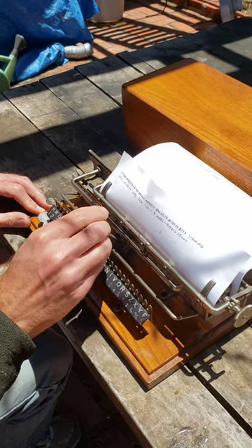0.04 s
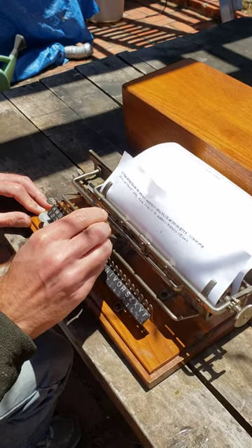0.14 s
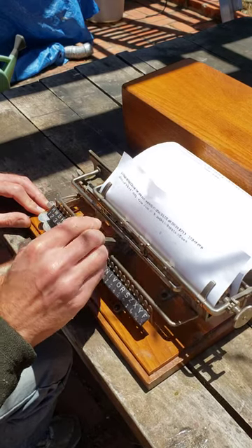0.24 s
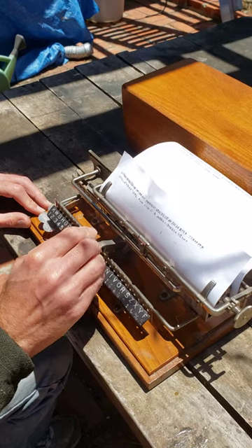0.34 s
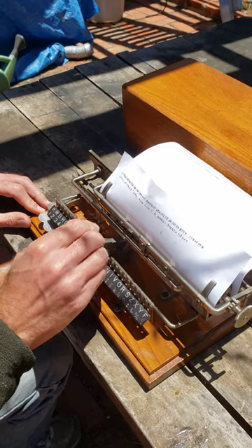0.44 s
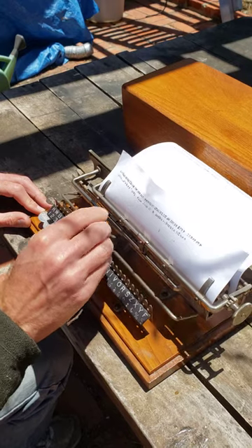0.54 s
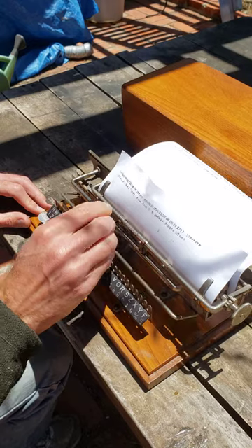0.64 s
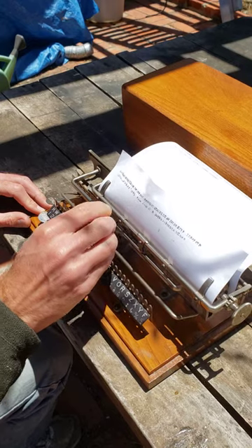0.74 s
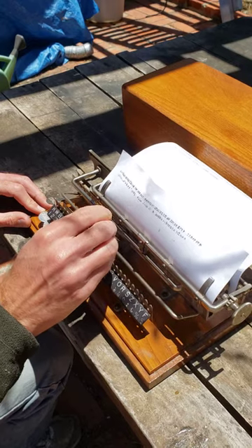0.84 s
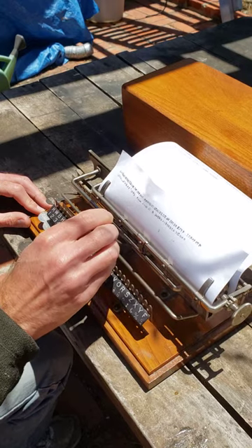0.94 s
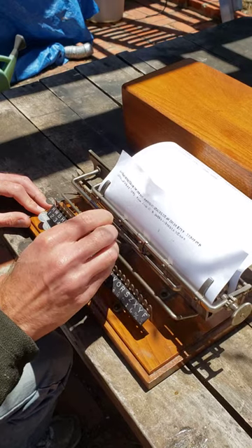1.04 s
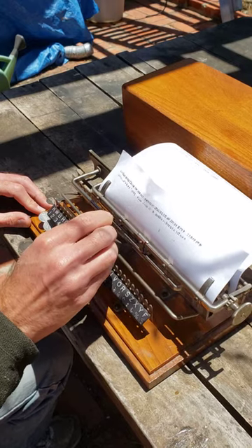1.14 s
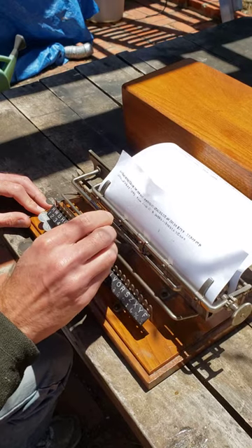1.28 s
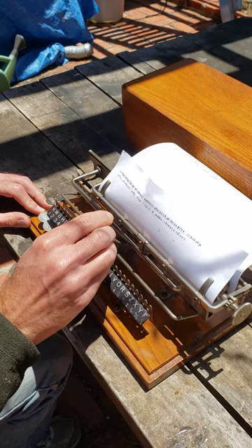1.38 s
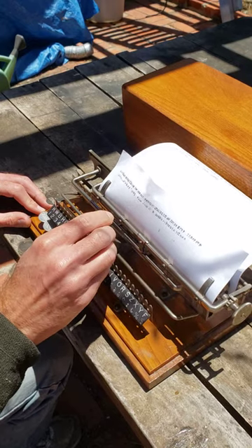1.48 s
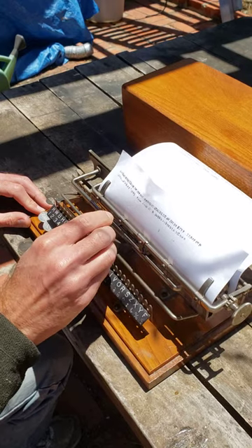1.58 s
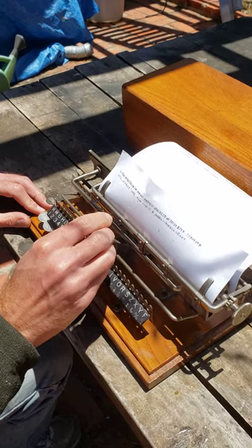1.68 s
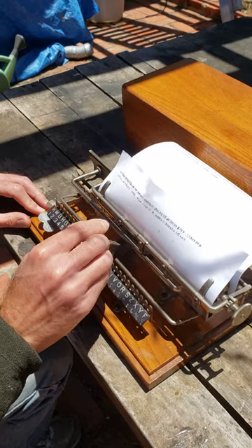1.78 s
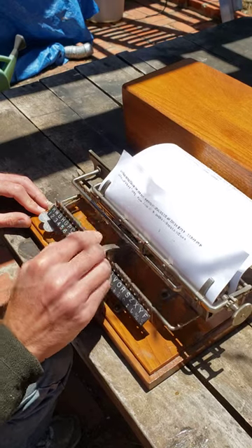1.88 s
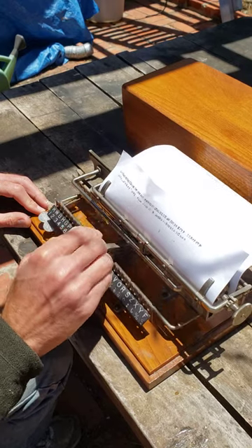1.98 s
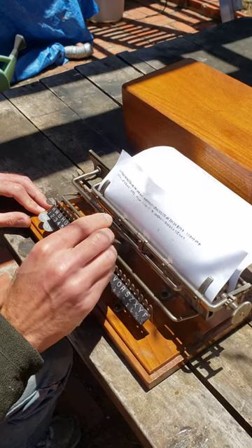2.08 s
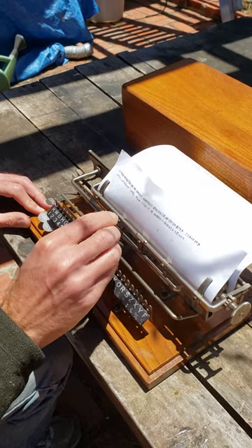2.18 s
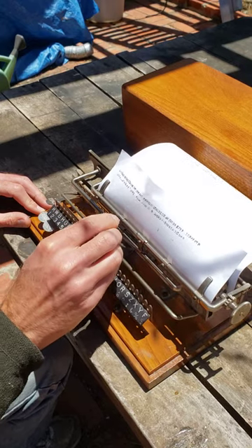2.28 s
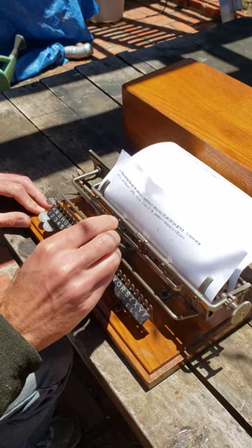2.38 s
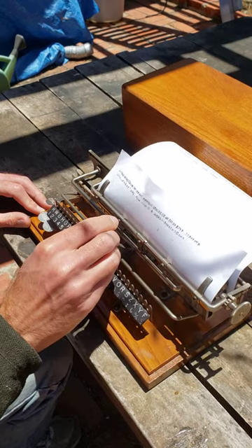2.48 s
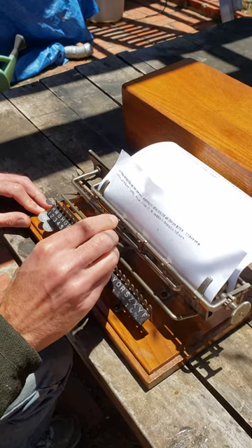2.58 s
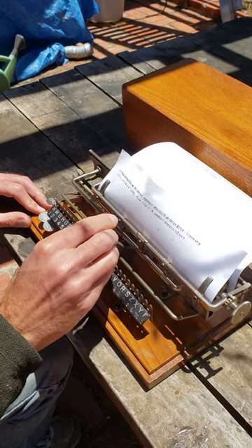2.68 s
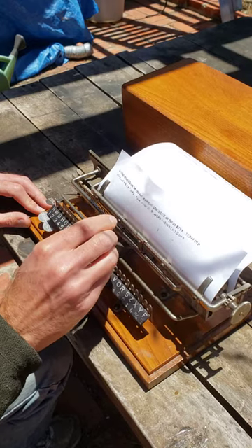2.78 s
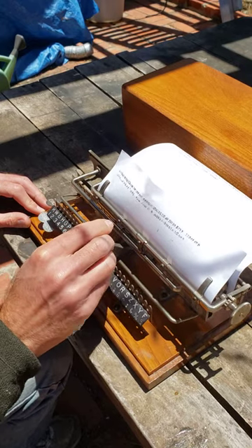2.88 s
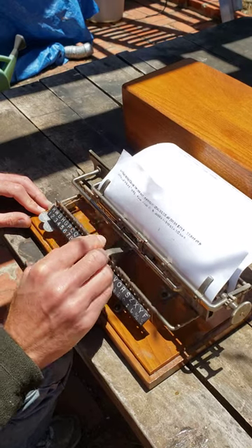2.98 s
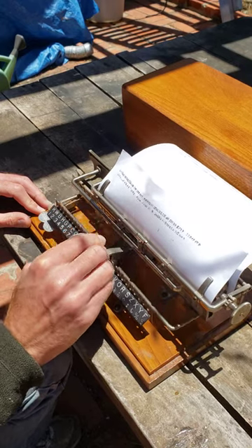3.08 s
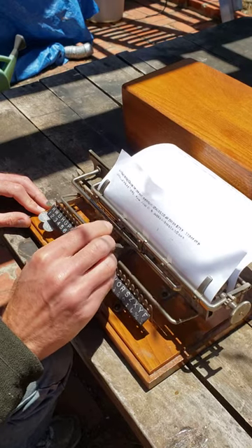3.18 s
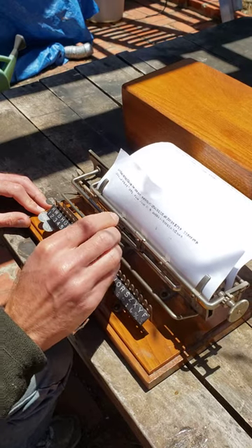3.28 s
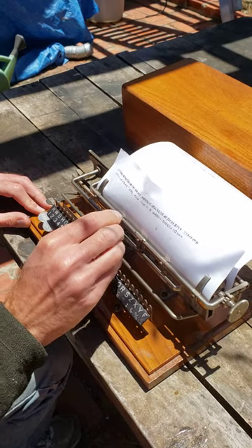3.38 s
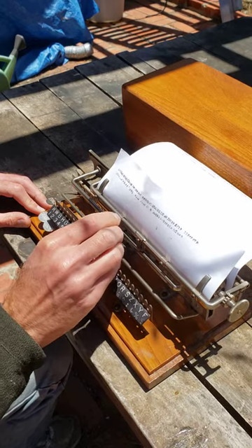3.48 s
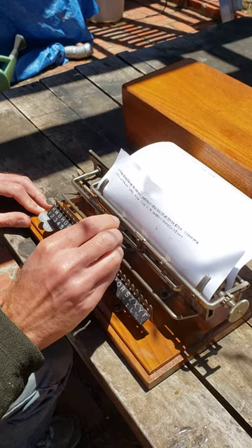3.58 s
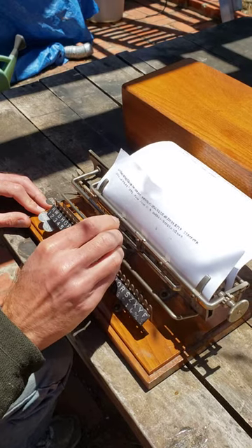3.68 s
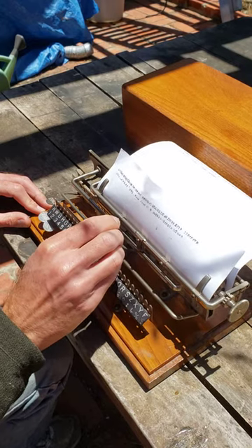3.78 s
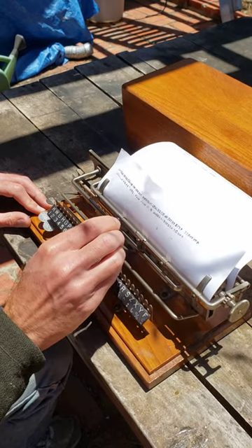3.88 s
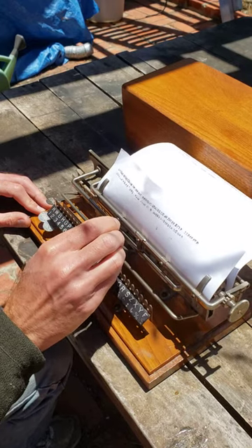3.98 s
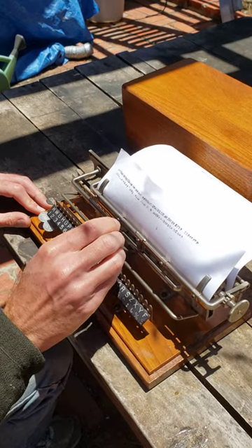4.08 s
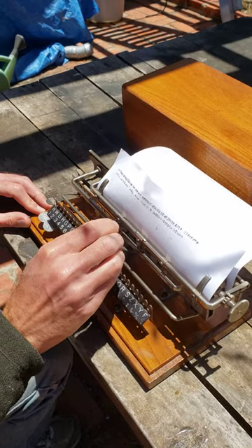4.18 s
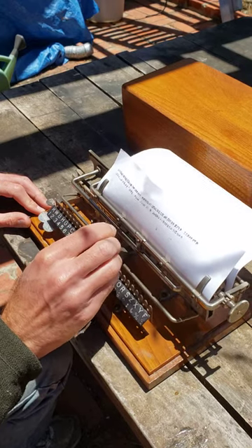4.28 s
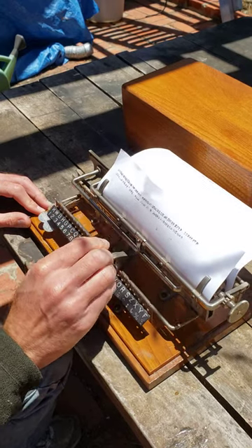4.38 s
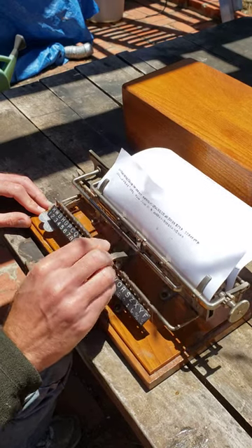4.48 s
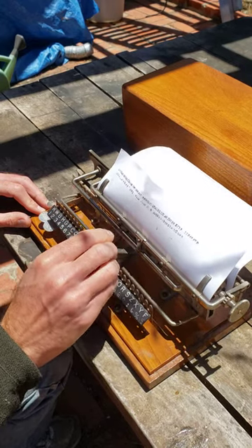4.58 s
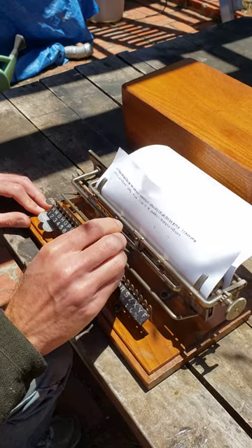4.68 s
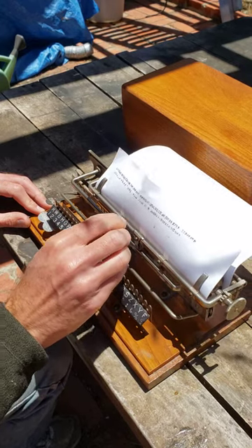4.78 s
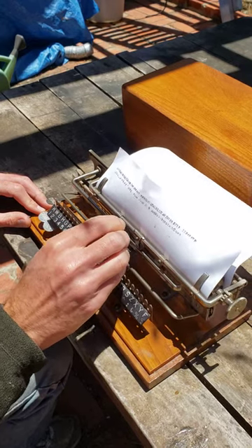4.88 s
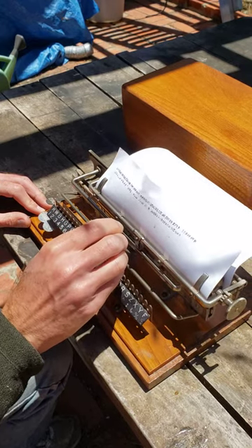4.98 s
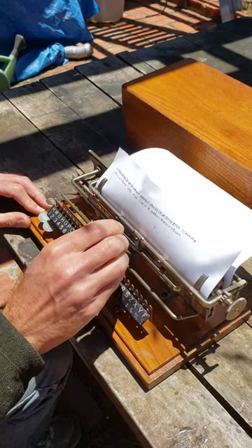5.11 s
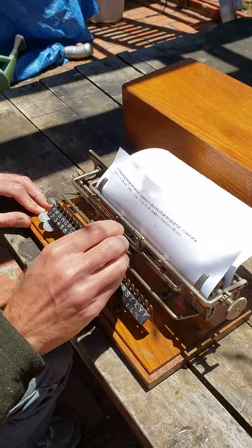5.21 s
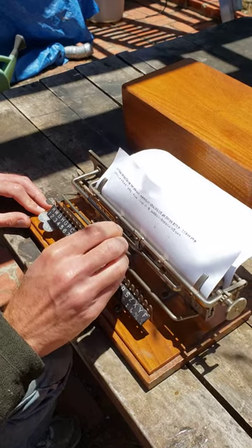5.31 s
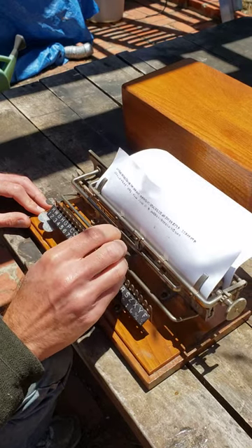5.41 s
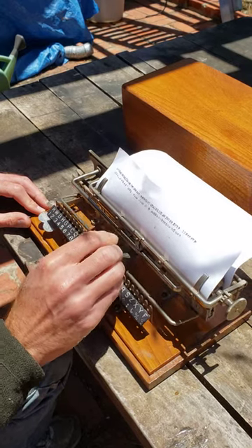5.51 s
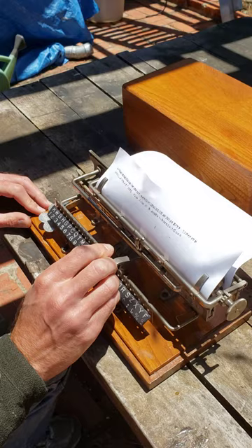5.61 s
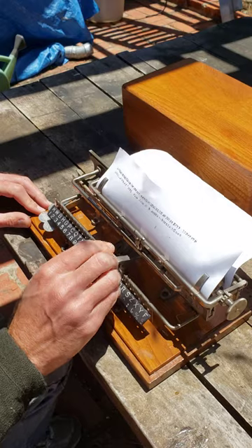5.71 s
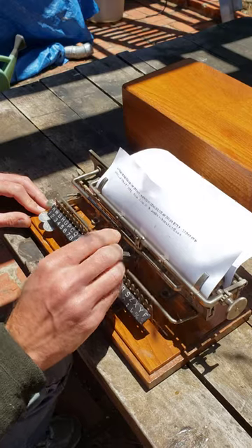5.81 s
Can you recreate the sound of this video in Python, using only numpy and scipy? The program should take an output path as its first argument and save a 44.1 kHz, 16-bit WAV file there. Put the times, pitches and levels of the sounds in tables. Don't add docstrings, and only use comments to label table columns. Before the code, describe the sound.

Five times, a little over a second apart, a small metal mechanism clicks, rattles and lands with a low knock on its wooden base, then snaps hard and bright about a fifth of a second later. Thin metal ringing trails very faintly. The small stereo microphone is close, the machine leaning left; behind it lies an open garden with soft distant traffic and tiny early peeps.

```python
import sys
import numpy as np
from scipy import signal
from scipy.io import wavfile
from scipy.ndimage import uniform_filter1d

SR = 44100
rng = np.random.default_rng(int(sys.argv[2]) if len(sys.argv) > 2 else 0)


def voltage_ratio(decibels):
    exponent = np.asarray(decibels, float) / 20
    return 10 ** exponent


def log_audio(samples):
    frames = np.atleast_2d(samples).T
    limited = np.clip(frames, -1, 1)
    pcm = np.round(limited * 32767).astype(np.int16)
    wavfile.write(sys.argv[1], SR, pcm)


N = 257984

# t/s, pawl ring level/dB, bright chatter above it/dB
SNAPS = [(0.5126, -7, -4), (2.0596, -5.5, -6), (3.1973, -10, -3), (4.6279, -12.5, -2), (5.8171, -12, -4)]
# t after the strike/ms, level/dB, contact/ms
REBOUNDS = [
    (0, 4.5, 0.025),
    (.7, -7, 0.04),
    (1.39, 0.5, .13),
    (1.74, 2.5, .13),
    (4.2, -11, 0.12),
    (7.0, -12, 0.11),
]
# f/Hz, level/dB, t60/s, right below left/dB, right late/ms
PAWL_MODES = [(1230, -23, 0.03, 1.5, 0.25), (1510, -22.5, 0.014, 2, 0.12), (1716, -19, 0.025, 2, .05),
              (1990, -17.5, 0.03, 3.5, 0.028), (2560, -7, 0.008, 7, .03), (2810, -0.5, 0.0045, 4.5, .05),
              (3020, -7, 0.008, -1, 0.048), (3900, -0.5, 0.0073, 7, 0.084), (4400, -13.5, 0.012, 6, 0.081),
              (4900, -15, 0.023, 4, 0.15), (6100, -13.5, 0.011, 2.5, .2), (7100, -9.5, 0.01, 5.5, .2),
              (7500, -9, 0.018, 6, .2)]
# f/Hz, level/dB, t60/s, right below left/dB, right late/ms
FRAME_MODES = [(1320, -10, .012, 4, 0.02), (2124, -7.5, 0.0037, 0, 0.04), (2400, -6, 0.0027, 16, 0.012),
               (2800, 1, .006, 2, 0.017), (3200, -2.5, 0.0039, 8.5, 0.013), (3650, 3, 0.0044, 14, 0.079),
               (4970, -7.5, 0.0086, -1.5, 0.15), (5450, -16.5, 0.015, 0.5, 0.42),
               (6288, -17.5, 0.021, -2.5, 0.3), (7200, -15.5, .006, 6, 0.19)]
# f/Hz, level/dB, t60/s, right below left/dB, right late/ms
LINK_MODES = [(8990, -14.5, 0.0018, 2, 0.6), (10300, -10.5, 0.00084, 3.5, 0.17),
              (12204, -6, 0.002, 1.5, 0.22), (11950, -0.5, 0.0023, 1, 0.08), (13400, -4, .0016, 2.5, 0.23),
              (13600, -4.5, 0.0025, 9.5, 0.17), (15000, -2.5, 0.0014, 9, 0.36),
              (15600, 1, 0.0027, 10, 0.067)]
# f/Hz, level/dB, t60/s, right below left/dB, right late/ms
BASE_MODES = [(230, -10.5, 0.05, 2.5, .05), (353, -11, .06, 1, 0.045), (420, -3.5, .05, 3.5, .05),
              (617.5, 4.5, 0.026, 5, .05), (810, -1, 0.04, 6.5, 0.11), (1050, -1.5, .03, 6.5, 0.28),
              (1538, -2, 0.015, 9.5, 0.078)]
PAWL_FREE_MS, PAWL_HELD_DB = 4.5, -14.5

# t after its start/ms, frame level/dB, bright chatter above it/dB,
# base knock above it/dB, chatter length/ms
ENGAGE = [
    (0, 1.5, -16, -11, 4.5),
    (9.5, -9.5, -3, -6.5, 2.5),
]
CLICK = [
    (0, 2, 0, -15, 2.7),
    (19, -19.5, -3.5, -3, 8.0),
]
LANDING = [
    (-4.5, -20.5, 2, 2, 4.5),
    (0, 1.5, -12, -14, 2.7),
    (6.5, -7.5, 2, -3.5, 3.8),
    (24, -22.5, -9, 5.5, 12.0),
    (47.5, -34, -13, 8, 14.0),
]
RELEASE = [
    (0, 1, 3, 1.5, 5.0),
    (7.8, 11, -17.5, -13.5, 1.8),
    (13, 0, -13, -12, 2.5),
    (18.46, 3.5, 0.5, -7.5, 6.0),
    (36, -7, -5, 0.5, 5.0),
]
# t/s, level/dB
ENGAGE_TIMES = [(0.2876, -23.5), (1.8186, -28.5), (2.9531, -46.5), (4.3688, -29), (5.5627, -35.5)]
CLICK_TIMES = [(0.296, -21), (1.8378, -21.5), (2.9642, -21), (4.3814, -25.5), (5.5681, -26.5)]
LANDING_TIMES = [(0.3308, -17), (1.87, -17), (3.0044, -18.5), (4.4268, -19), (5.6138, -17.5)]
RELEASE_TIMES = [(.4597, -35), (2.0068, -36), (3.134, -40.5), (4.5677, -35), (5.7463, -38)]
# t/s, level/dB, bright chatter above it/dB
BOUNCES = [(.3346, -21, -3), (.3437, -29, 4), (1.9057, -42, -15.5), (1.9292, -44, -11), (4.4429, -28, -0.5),
           (4.4505, -40, -18), (4.4661, -41, -19.5), (4.4791, -41.5, -6), (5.6287, -25.5, 4),
           (5.6364, -28.5, -10), (5.6449, -34.5, -8), (5.6521, -28.5, -5), (5.6645, -37.5, 0),
           (5.6743, -43, -12)]
BOUNCE_KNOCK_DB, BOUNCE_MS = -11, 4.0
# t/s, level/dB, bright chatter above it/dB, base knock above it/dB
TOUCHES = [(0.1838, -52, -5, -9), (0.2531, -48.5, -14, 3), (0.2735, -56, 0, -11), (.589, -55.5, -4, -8),
           (.6137, -56.5, 6, 3.5), (1.6978, -55, -2, -5.5), (1.775, -59, -6.5, -7.5),
           (2.378, -53.5, -10.5, -3.5), (2.8604, -49, 4, -11), (2.8823, -54.5, -1, -14),
           (2.9043, -52, -17.5, 8.5), (2.924, -50, -7, -7), (3.3124, -57, 0, -1), (4.2432, -49, 2.5, -10),
           (4.2651, -50, -17, 5), (4.2952, -51, -10, 3), (4.322, -53, -8, 2), (4.352, -53, -9.5, -8),
           (4.7152, -47, -8, -11.5), (4.7214, -49.5, 0.5, -2), (5.4041, -51.5, 7.5, -3),
           (5.4636, -50.5, -23, 4), (5.472, -52.5, -17, 7.5), (5.5961, -43, -4, -12)]
TOUCH_MS, DRAG_AFTER_MS, DRAG_DB, DRAG_MS = 2.6, 8.9, -8.5, 14

# t/s, level/dB, f/Hz
THUDS = [(0.296, -37, 113), (0.331, -21, 170), (1.841, -25, 113), (1.871, -24, 172), (2.968, -42, 104.8),
         (3.005, -27, 129), (4.372, -89.5, 90), (4.428, -26, 172), (4.449, -19, 104), (5.617, -25.5, 130),
         (5.687, -19, 101)]
# t/s, guide rod level/dB, rack level/dB
RODS = [(0.336, -80.5, -75.5), (.513, -80, -59.5), (2.06, -82.5, -56.5), (3.01, -64, -84),
        (3.195, -71.5, -66), (4.628, -75.5, -71.5)]
GUIDE_HZ, GUIDE_T60, RACK_T60 = 3488, 3.8, 0.75
RACK_HZ = np.array([[5846], [5965], [6029]])
RACK_DB = [
    [-4.5],
    [1],
    [-5.5],
]
# t/s, level/dB, f/Hz, t60/s
PINGS = [(.1842, -58, 6400, 0.026), (1.6973, -57.5, 6500, .03), (2.86, -53.5, 6470, .03),
         (4.2432, -56, 6650, 0.027), (2.378, -58.5, 5950, 0.033), (5.4725, -50, 2800, 0.06),
         (5.535, -64, 7000, 0.036)]

# f/Hz, t60/s
YARD_DECAY = [(300, 0.4), (1300, 0.29), (3500, 0.3245), (9000, 0.2669), (16000, 0.22)]
# f/Hz, level/dB
YARD_TONE = [(300, 1.5), (1000, 5.5), (3000, -5.5), (6000, 0.5), (9000, -4), (15000, -8.5)]
YARD_DB, CRACK_DB = -9.5, 5
NEAR_DB, NEAR_T60 = 13.5, 0.05

# t/s, f/Hz, level/dB
PEEPS = [
    [(.9, 10320, -107), (.92, 10350, -62.5), (.976, 10290, -67), (1.0, 10300, -99)],
    [(1.36, 2720, -93), (1.378, 2770, -82), (1.42, 2740, -67.5), (1.48, 2770, -92)],
]
# f/Hz, level per Hz/dB
AIR_TONE = [(24, -34), (45, -7), (63, -1.5), (152, -17), (211, -19.5), (286, -24), (358, -26),
            (1890, -46.5), (3210, -50.5), (3550, -49), (4020, -56), (6020, -50.5), (8360, -62),
            (15300, -58), (16500, -83.5)]
AIR_DB, RUMBLE_TOP_HZ = -45, 130
# t/s, level/dB
TRAFFIC = [(0.0, -53.5), (0.99, -51), (1.55, -53), (1.9, -50), (2.31, -54), (2.7, -50), (3.16, -49.5),
           (3.24, -50.5), (4.01, -51), (5.85, -45)]
# t/s, level/dB
FAR_WASH = [(0.0, -70), (0.34, -68), (2.9, -71), (3.08, -63.5), (3.44, -71), (4.28, -71.5), (4.43, -67),
            (5.36, -71), (5.85, -63)]
# f/Hz, likeness/1
AIR_SAME = [(60, .86), (150, .94), (380, .77), (950, .1), (2380, .05), (5980, .04), (15000, .035)]
# f/Hz, left above right/dB
AIR_LEFT = [(60, 0.5), (150, 3.4), (380, 4.5), (950, 9), (2380, 10), (5980, 5.5), (15000, 5.5)]
MIC_LOW_HZ, MIC_TOP_HZ = 45.5, 15800


def pawl():
    snap, crack = np.zeros((2, N)), np.zeros((2, N))
    fizz = rng.standard_normal((2, 900))
    t_ms = np.arange(2699) / SR * 1000
    for (s, db, bright_db), draw in zip(SNAPS, rng.standard_normal((len(SNAPS), 4, 900))):
        blows = voltage_ratio(-32.0) * chatter(draw, 4.5)
        for ms, rebound_db, contact_ms in REBOUNDS:
            push = np.exp(-0.5 * ((t_ms[:40] - 0.2) / (contact_ms / 2)) ** 2)
            add(blows, ms / 1000, voltage_ratio(rebound_db) * push[None] / push.sum())
        modes = body(PAWL_MODES, 1300, draw[2:], spread=0.015, spread_db=2.2, rise_ms=0.4)
        ring = signal.fftconvolve(blows, modes, axes=1)
        held = np.clip((t_ms - PAWL_FREE_MS) / 0.38 + 1, 0, 1)
        ring = peaked(ring * voltage_ratio(PAWL_HELD_DB * held), db + 0.4)
        buzz = chatter(fizz + 0.5 * draw[:2], 2.5) + voltage_ratio(4.5) * blows
        links = signal.fftconvolve(buzz, body(LINK_MODES, 7000, 0.22 * draw[2:]), axes=1)
        ring += peaked(links, db + bright_db - 0.3)
        start = s - 0.0002
        add(snap, start, ring)
        add(crack, start, ring * voltage_ratio(14.0 - 25 * t_ms))
    return snap, crack


def lever():
    out, rows = np.zeros((2, N)), contacts()
    for (s, db, bright_db, knock_db, ms), draw in zip(rows, rng.standard_normal((len(rows), 3, 4, 900))):
        parts = ((FRAME_MODES, 1100, db - 0.4),
                 (LINK_MODES, 7000, db + bright_db - 0.4),
                 (BASE_MODES, 200, db + knock_db + 0.5))
        for (modes, low_hz, part_db), chance in zip(parts, draw):
            ring = signal.fftconvolve(chatter(chance, 1.5 * ms), body(modes, low_hz, chance[2:]), axes=1)
            add(out, s, peaked(ring, part_db))
    return out


def contacts():
    rows = []
    for action, times in ((ENGAGE, ENGAGE_TIMES), (CLICK, CLICK_TIMES),
                          (LANDING, LANDING_TIMES), (RELEASE, RELEASE_TIMES)):
        for s, db in times:
            rows += [(s + ms / 1000, db + part_db, *rest) for ms, part_db, *rest in action]
    rows += [(*row, BOUNCE_KNOCK_DB, BOUNCE_MS) for row in BOUNCES]
    rows += [(*row, TOUCH_MS) for row in TOUCHES]
    rows += [(s + DRAG_AFTER_MS / 1000, db + DRAG_DB, *rest, DRAG_MS) for s, db, *rest in TOUCHES]
    return rows


def body(modes, low_hz, draw, spread=0.049, spread_db=1.8, rise_ms=0.017):
    hz, db, t60, right_db, late_ms = np.transpose(modes)[..., None]
    hz = hz * (1 + spread * draw[0, :len(hz), None])
    db = db + spread_db * draw[1, :len(hz), None]
    late = np.array([0 * late_ms, late_ms / 1000])
    t = np.maximum(np.arange(1800) / SR - late, 0)
    level_db = db - np.array([0 * db, right_db]) - 60 * t / t60
    ring = voltage_ratio(level_db) * np.sin(2 * np.pi * hz * t)
    ring *= 1 - np.exp(-1000 * t / rise_ms)
    return signal.sosfilt(signal.butter(3, low_hz, "high", fs=SR, output="sos"), ring.sum(1))


def chatter(draw, ms, spike_db=6.0):
    t_ms = np.arange(draw.shape[1]) / SR * 1000
    return draw[:1] * voltage_ratio(spike_db * draw[1] - 10 * t_ms / ms)


def thuds():
    out, t = np.zeros(N), np.arange(4000) / SR
    for s, db, hz in THUDS:
        rise = 1 - np.exp(-t / 0.0037)
        add(out, s, voltage_ratio(db - 60 * t / 0.042) * rise * np.sin(2 * np.pi * hz * t))
    return out * voltage_ratio(np.array([[1.5], [-1.5]]))


def rods():
    out, t = np.zeros(N), np.arange(3 * SR) / SR
    for s, guide_db, rack_db in RODS:
        beat = 1 + 0.2 * np.cos(2 * np.pi * 2.3 * t)
        add(out, s, beat * voltage_ratio(guide_db - 60 * t / GUIDE_T60) * np.sin(2 * np.pi * GUIDE_HZ * t))
        waver = voltage_ratio(3.9 * evened(uniform_filter1d(rng.standard_normal(len(t)), 250)))
        group = (voltage_ratio(RACK_DB) * np.sin(2 * np.pi * np.array(RACK_HZ) * t)).sum(0)
        add(out, s, waver * voltage_ratio(rack_db - 60 * t / RACK_T60) * group)
    for s, db, hz, t60 in PINGS:
        add(out, s, voltage_ratio(db - 60 * t / t60) * np.sin(2 * np.pi * hz * t))
    return out * voltage_ratio(np.array([[2.5], [-2.5]]))


def yard(x):
    out, turn = np.zeros((2, N)), 2 * np.pi * np.arange(N) / SR * 7.3
    for k in range(3):
        taps = np.zeros((2, SR // 2))
        at = np.arange(120, SR // 2 - 12, 12)
        at = at + rng.integers(0, 12, (2, len(at)))
        np.put_along_axis(taps, at, rng.choice([-1., 1.], at.shape), 1)
        hz, t, z = signal.stft(taps, SR, nperseg=128)
        fall = voltage_ratio(-60 * t / read(YARD_DECAY, hz)[:, None]) + voltage_ratio(NEAR_DB - 60 * t / NEAR_T60)
        z *= voltage_ratio(read(YARD_TONE, hz))[:, None] * fall
        tail = signal.istft(z, SR, nperseg=128)[1]
        window = np.sqrt(2 / 3) * np.cos(turn + k * np.pi / 3)
        out += signal.fftconvolve(x * window, tail / np.linalg.norm(tail[0]), axes=1)[:, :N]
    return out


def birds():
    out = np.zeros(N)
    for rows in PEEPS:
        s, hz, db = np.transpose(rows)
        t = np.arange(s[0], s[-1], 1 / SR)
        waver = 1 + 0.1 * uniform_filter1d(rng.standard_normal(len(t)), 200)
        phase = 2 * np.pi * np.cumsum(np.interp(t, s, hz) * waver) / SR
        add(out, s[0], voltage_ratio(np.interp(t, s, db)) * np.sin(phase))
    return out * voltage_ratio(np.array([[2.5], [-3.5]]))


def air():
    frames, hz = N // 512 + 5, np.fft.rfftfreq(2048, 1 / SR)
    a, b, c, d, patches = rng.standard_normal((frames, 1025, 5)).T
    patches = evened(uniform_filter1d(uniform_filter1d(patches, 20, 0), 10, 1))
    t = np.arange(frames) * 512 / SR
    s, db = np.transpose(TRAFFIC)
    swell_db = np.interp(t, s, db - db.mean())
    s, db = np.transpose(FAR_WASH)
    fade_db = np.interp(t, s, db - db.mean())
    share = 1 / (1 + (hz / RUMBLE_TOP_HZ) ** 2)[:, None]
    drift_db = share * (swell_db - fade_db) + fade_db
    same = np.clip(read(AIR_SAME, hz), -1, 1)[:, None]
    left = a + 1j * b
    z = np.array([left, same * left + np.sqrt(1 - same ** 2) * (c + 1j * d)])
    lean_db = read(AIR_LEFT, hz) / 2 * np.array([[1], [-1]])
    tone_db = (read(AIR_TONE, hz) + lean_db)[..., None]
    z *= voltage_ratio(tone_db + 1.2 * patches + drift_db) * (hz > 20)[:, None]
    return voltage_ratio(AIR_DB) * evened(signal.istft(z, nperseg=2048, noverlap=1536)[1][:, :N])


def evened(x):
    return x / np.sqrt(np.mean(x ** 2) + 1e-20)


def peaked(x, db):
    return voltage_ratio(db) * x / np.sqrt(2 * uniform_filter1d(x[0] ** 2, size=50).max())


def read(points, hz):
    f, value = np.transpose(points)
    return np.interp(np.log(hz + 1), np.log(f + 1), value)


def add(mix, s, sound):
    part = mix[..., round(s * SR):][..., :sound.shape[-1]]
    part += sound[..., :part.shape[-1]]


def scene():
    rattle, (snap, crack) = lever(), pawl()
    scatter = voltage_ratio(YARD_DB) * yard(rattle + voltage_ratio(CRACK_DB) * crack)
    return rattle + snap + scatter + thuds() + rods() + birds() + air()


def top_cut(x):
    return signal.sosfilt(signal.butter(12, 17130, fs=SR, output="sos"), x)


def record(dry):
    heard = signal.sosfilt(signal.butter(4, MIC_LOW_HZ, "high", fs=SR, output="sos"), dry)
    heard = signal.sosfilt(signal.cheby1(8, 0.5, MIC_TOP_HZ, fs=SR, output="sos"), heard)
    return top_cut(heard)


dry = scene()
out = record(dry)
log_audio(out)
```